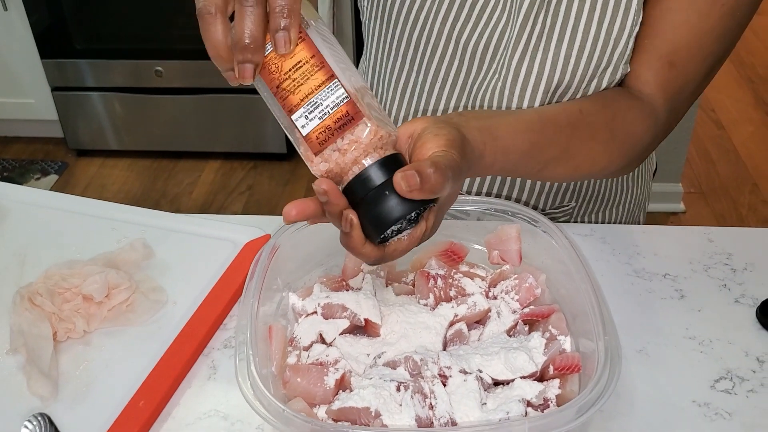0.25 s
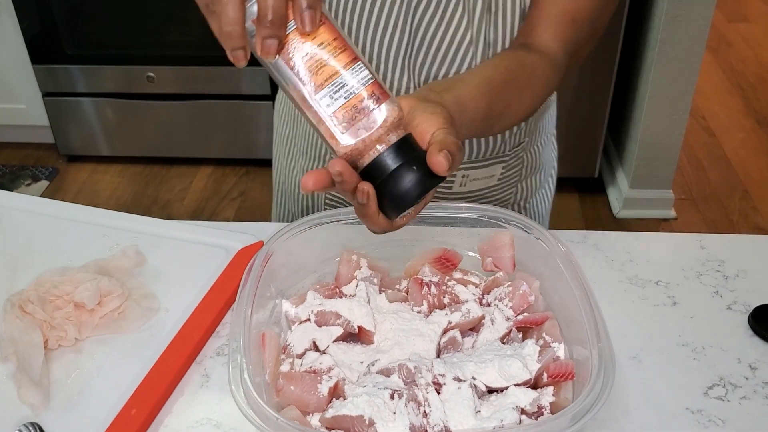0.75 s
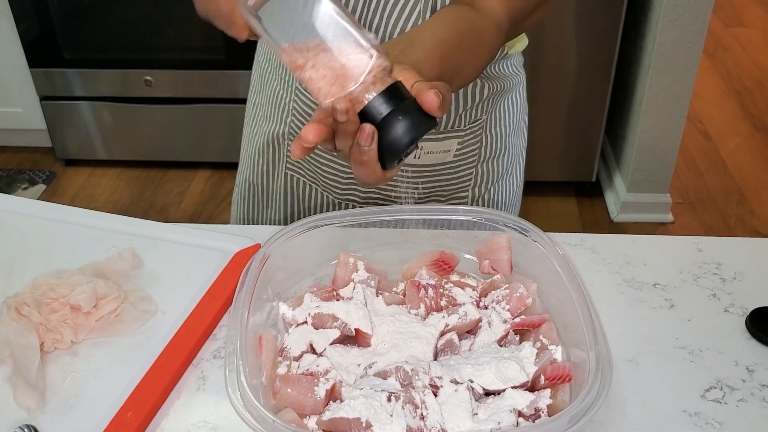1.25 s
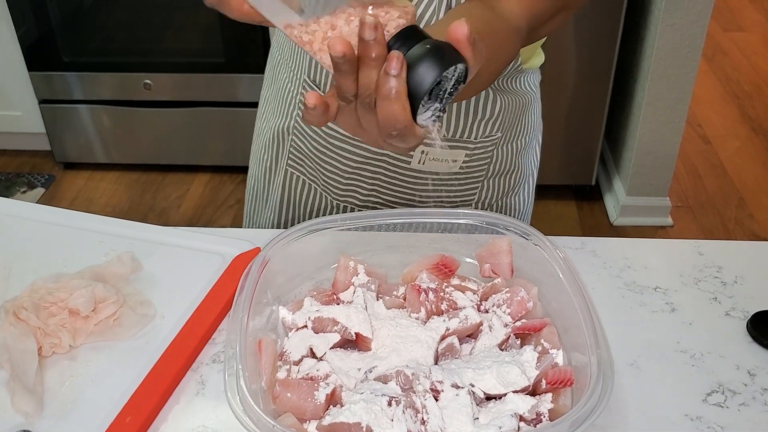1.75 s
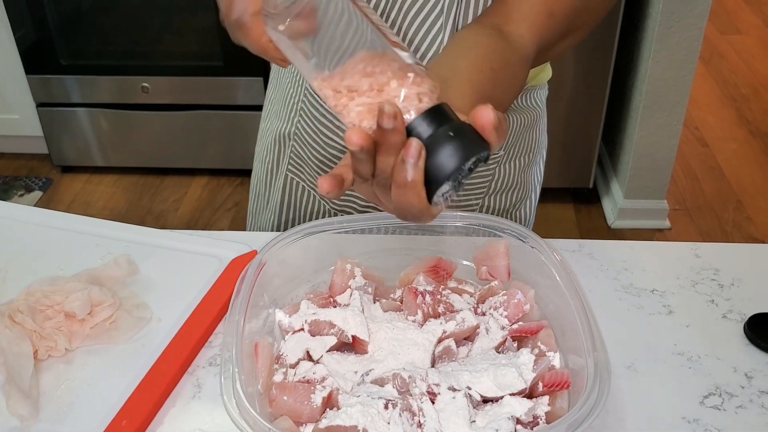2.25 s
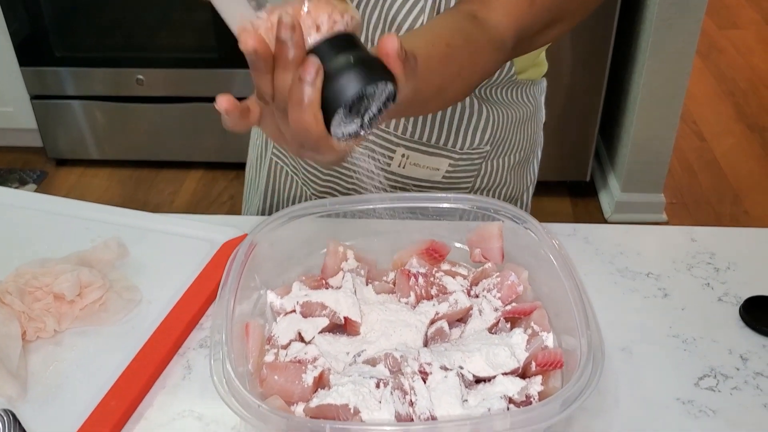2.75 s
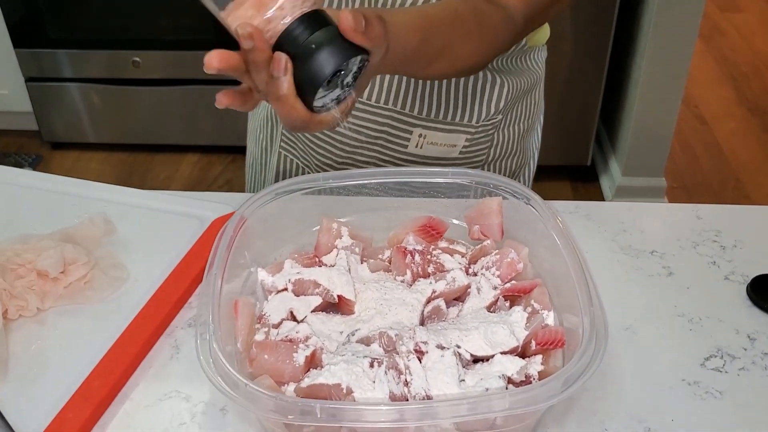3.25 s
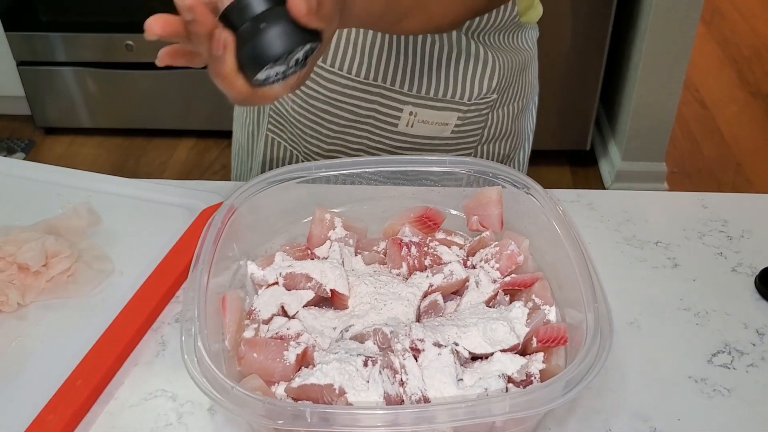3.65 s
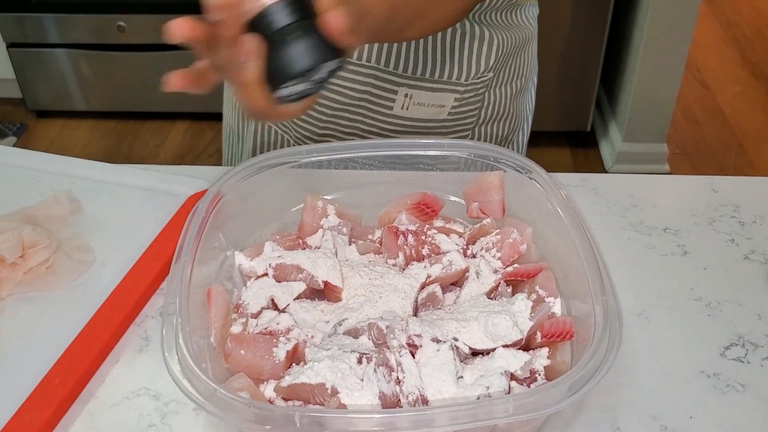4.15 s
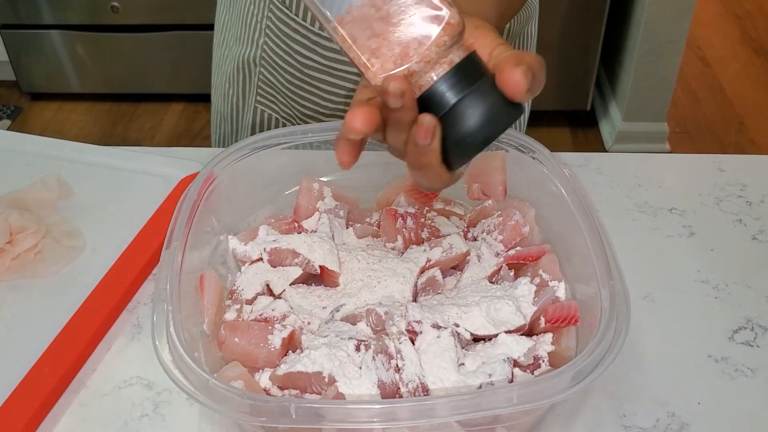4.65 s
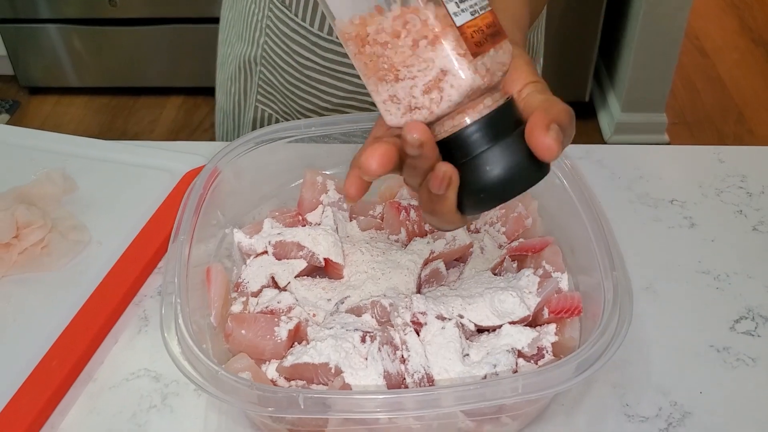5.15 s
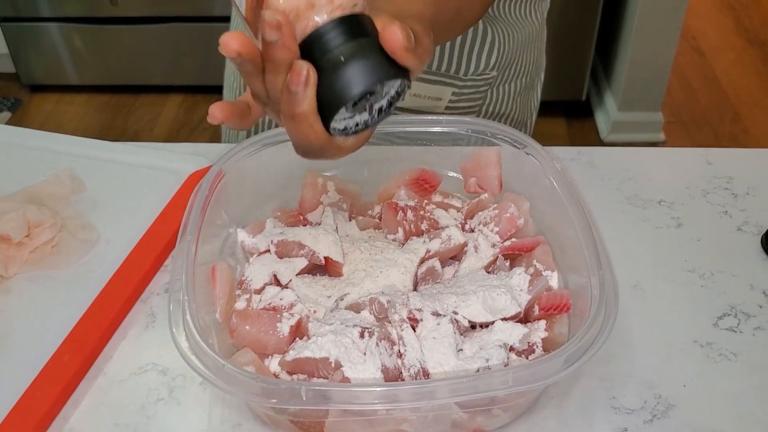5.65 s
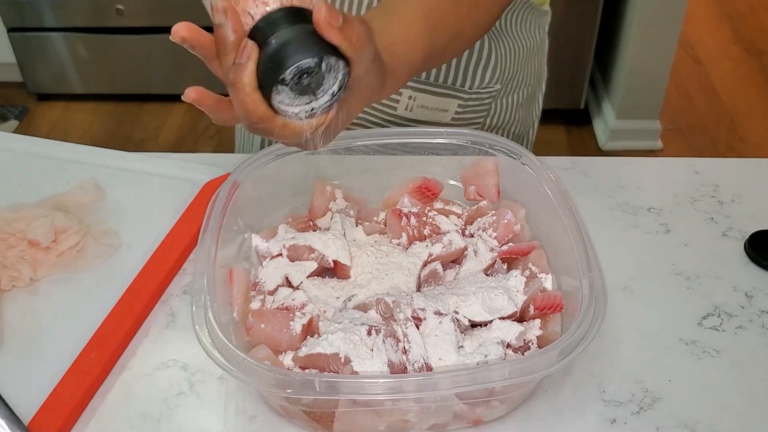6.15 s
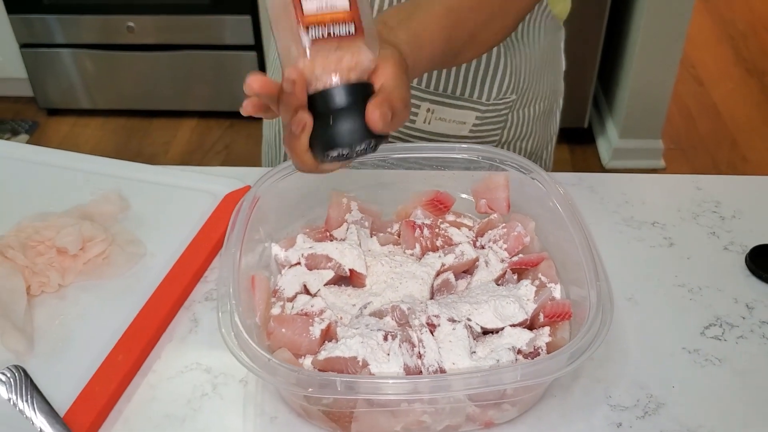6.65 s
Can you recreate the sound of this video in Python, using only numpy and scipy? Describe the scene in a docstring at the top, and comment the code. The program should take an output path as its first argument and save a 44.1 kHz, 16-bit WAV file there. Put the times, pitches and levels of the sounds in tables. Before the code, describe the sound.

Close to the microphone in a small kitchen, a plastic grinder of coarse salt is turned by hand. Two faint crunches sound within the first 0.2 seconds, then soft rubbing and low bumps of the grip until about 0.9. At 1.0 a loud, cracking stroke starts the grinding. Quick gritty twists follow, strong around 1.65, 1.9, 2.1 and 2.6, each mixing hollow crunch, fine fizz and a dull thud. It eases near 3.0, with short scrapes and crunches at 3.2 to 3.6 and a hard stroke at 3.9. After a lull with light handling, a sharp crack lands near 4.7. More strokes come at 5.0, 5.35, 5.7 and 5.95 to 6.2, with faint trickling grains between some. After a brief pause, two crisp strokes at 6.57 and 6.65 finish brightest. A short room tail follows; a very faint hush lies beneath.

```python
"""A plastic grinder of coarse salt is worked by hand over a bowl in a small kitchen, the microphone close by.
It opens on two faint strokes; then the hands rub and bump the grip, and from about one second the strokes
come quick and loud, broken by short lulls, the last two the brightest. Noise-like trains of random impacts
ring through the jar as crunch, fizz and thud; single crystals crack, scrape the wall or trickle.
A short room tail follows every sound but the steady faint hush beneath."""
import sys
import numpy as np
from scipy import signal
from scipy.io import wavfile

SR = 44100
rng = np.random.default_rng(int(sys.argv[2]) if len(sys.argv) > 2 else 0)


def int16_out(signal):
    """Quantize to a 16-bit WAV file."""
    q = np.round(np.clip(np.atleast_2d(signal).T, -1, 1) * 32767)
    wavfile.write(sys.argv[1], SR, q.astype(np.int16))


N = 303849
TIME = np.arange(N) / SR

# Large crystals that crack or strike the wall. Each row: start in seconds, level in dB ahead of the common gain,
# treble tilt in dB per octave ahead of the common brightening, decay time constant in seconds, ping in Hz.
CRACKS = [(0.021, -31.5, -2, 0.014, 1920), (0.107, -34.5, -0.5, 0.014, 799),
          (0.539, -41, -12, 0.0024, 1070), (0.978, -18.5, 2, 0.009, 910), (0.992, -11.5, -4, 0.0023, 2170),
          (1.005, -15.5, -6, 0.005, 1380), (1.049, -19, -12, 0.0057, 1170), (1.647, -18.5, -2, 0.024, 1400),
          (2.041, -23.5, 4, 0.0087, 1420), (2.081, -8, 1.3, 0.0096, 1230), (2.135, -16, -2.5, 0.015, 1190),
          (2.243, -26, 6, 0.0051, 1200), (2.596, -16, 1, 0.012, 1180), (2.622, -18.5, 2, 0.024, 1310),
          (2.648, -12.5, 1.5, 0.016, 1250), (3.006, -26, 5, 0.005, 1160), (3.093, -34, 9, 0.0091, 4660),
          (3.183, -28, -5.5, 0.0066, 1500), (3.239, -28, 10.5, 0.018, 1560), (3.544, -45, 4, 0.0067, 791),
          (3.792, -33.5, 4, 0.007, 1390), (3.819, -24.5, -2, 0.02, 1190), (3.871, -13.5, 0, 0.019, 1560),
          (3.961, -16.5, 4.5, 0.0055, 810), (4.217, -41, 2, 0.0075, 1530),
          (4.558, -21.5, -2.5, 0.0049, 1080), (4.593, -14.5, -3, 0.0028, 1390),
          (4.625, -17.5, 1, 0.0072, 1370), (4.676, -7, 3, 0.0076, 1350), (5.056, -29, 11, 0.014, 3380),
          (5.285, -38.5, 5, 0.0045, 1270), (5.324, -26.5, 1.5, 0.033, 1330),
          (5.359, -17.5, -0.5, 0.017, 1280), (5.6, -26, 6.5, 0.0069, 1980), (5.896, -30, 10, 0.0039, 1150),
          (5.926, -29, 4, 0.008, 1250), (5.972, -21.5, 3, 0.0086, 1230), (5.999, -11.5, 0, 0.0062, 1140),
          (6.034, -15.5, 3, 0.01, 1280), (6.336, -34.5, 7, 0.012, 1400), (6.573, -23, -19, 0.016, 1600),
          (6.662, -16, 7, 0.01, 3330)]
# Resonances of the jar and its cap. Each row: centre in Hz, width in Hz, lift in dB (negative is a dip).
JAR = [(481, 120, 5.5), (677.4, 20, 10.5), (810, 79, 7), (1190, 45, 6.5), (1339, 46, 6), (1564, 21, 4.5),
       (2010, 170, -1), (2020, 12, 3), (2173, 130, 4), (2403, 48, 4.5), (3117, 180, 4.5), (3460, 180, 5),
       (4690, 270, 2.5), (5380, 27, -9.5), (6360, 44, 5), (9100, 47, 4)]
# Spectrum of the crunch. Each row: frequency in Hz, relative density in dB per Hz.
COARSE = [(100, -33), (220, -3.5), (400, -7), (600, -3.5), (950, -1.5), (1250, -2), (1700, -1),
          (2300, -5.5), (2800, -6.5), (3600, -11.5), (5000, -15.5), (8000, -29.5), (15000, -63.5)]


def amp(db):
    """Decibels to gain."""
    return 10 ** (np.asarray(db) / 20)


def evened(x):
    """Scales to rms 1."""
    return x / np.sqrt(np.mean(x ** 2) + 1e-20)


def read(points, hz):
    """Reads a curve of (Hz, value) points on a log-frequency axis."""
    f, value = np.transpose(points)
    return np.interp(np.log(hz + 1), np.log(f + 1), value)


def add(mix, s, sound):
    """Mixes a sound in at s seconds."""
    part = mix[max(round(s * SR), 0):][:len(sound)]
    part += sound[:len(part)]


def steadied(x, span):
    """Holds the rms at 1 over stretches of span seconds, keeping the finer grain."""
    window = signal.windows.hann(int(span * SR) + 3)
    power = abs(signal.fftconvolve(x ** 2, window / window.sum(), "same"))
    return x / np.sqrt(power + 1e-12)


def ring(spectrum, modes=(), tilt_db=0, size=4096):
    """Causal impulse response of unit energy: a broad spectrum with resonances on top."""
    hz = abs(np.fft.fftfreq(size, 1 / SR))
    db = read(spectrum, hz) + tilt_db * np.log2(1 + hz / 1000)
    for f, width, lift in modes:
        db = db + lift / (1 + (2 * (hz - f) / width) ** 2)
    minimum_phase = np.exp(np.conj(signal.hilbert(np.log(amp(db)))))
    response = np.fft.ifft(minimum_phase).real
    return response / np.linalg.norm(response)


def through(x, response):
    """Plays x through an impulse response."""
    return signal.oaconvolve(x, response)[:len(x)]


def resonate(x, hz, width):
    """A resonance of gain 1 that follows the curve hz: shift down to zero, smooth, shift back."""
    turn = np.exp(2j * np.pi * np.cumsum(hz) / SR)
    r = np.exp(-np.pi * width / SR)
    return 2 * (turn * signal.lfilter([1 - r], [1, -r], x / turn)).real


def grains(per_s, spread_db):
    """Random impacts of either sign: many small, a few large."""
    size = amp(spread_db * np.minimum(rng.exponential(1, N), 4))
    sign = rng.choice([-1, 1], N)
    return evened(size * sign * (rng.random(N) < per_s / SR))


def swells(rows, fall_db_per_s, rise_power=1.62, sag_db_per_s=7):
    """Gain over time of movements (start, rise, hold, dB): each speeds up, holds almost level and settles."""
    power = np.zeros(N)
    t = np.arange(SR) / SR
    for start, rise, hold, db in rows:
        attack = np.minimum(t / max(rise, 1 / SR), 1) ** rise_power
        sag_db = sag_db_per_s * np.clip(t - rise, 0, hold)
        fall_db = fall_db_per_s * np.maximum(t - rise - hold, 0)
        add(power, start, (attack * amp(db - sag_db - fall_db)) ** 2)  # overlaps add in power
    return np.sqrt(power)


def room_hush(level_db=-63.5):
    """The faint steady hush of the room: white noise shaped by a broad spectrum."""
    # Each row: frequency in Hz, relative density in dB per Hz.
    hush_spectrum = [(30, -22.5), (120, 8), (200, -6), (380, -9), (600, -6.5), (950, 4.5), (1250, -11.5),
                     (1700, -15.5), (2500, -29.5), (9000, -33), (15500, -53)]
    return amp(level_db) * through(rng.standard_normal(N), ring(hush_spectrum))


def kitchen(x, gap_s=.003, count=12, tails_per_s=20):
    """A short diffuse tail, crossfaded through several random tails so that no single one colours the sound."""
    # Each row: frequency in Hz, reverberation time t60 in seconds.
    decay = [(100, 0.17), (500, 0.27), (1200, 0.16), (3000, 0.23), (6000, 0.23), (14000, 0.22)]
    out, turn = np.zeros(N), TIME * tails_per_s
    for k in range(count):
        hz, t, z = signal.stft(rng.standard_normal(SR // 2), SR, nperseg=256)
        fade = np.exp(-np.log(1000) * t / read(decay, hz)[:, None])
        tail = signal.istft(z * fade, SR)[1]
        tail[:int(gap_s * SR)] = 0  # nothing returns before the first reflection
        weight = np.sin(np.pi / 2 * np.minimum((turn - k) % count, 2))  # neighbouring tails crossfade
        out += through(x * weight, tail / np.linalg.norm(tail))
    return out


def hands(rub_db=3.5, bump_rise_s=0.0011):
    """Soft rubbing as the grip shifts, made of dense grains, and low bumps as decaying sines."""
    # Each row: start in seconds, rise in seconds, hold in seconds, level in dB ahead of rub_db.
    grip = [(.335, 0.029, 0.022, -50.5), (.385, .018, 0.012, -43), (.44, 0.015, 0.019, -40.5),
            (.525, 0.011, 0.0051, -53.5), (.66, 0.093, 0.05, -49), (.755, 0.0088, 0.0063, -41),
            (.788, 0.015, 0.0086, -44), (.88, 0.036, 0.048, -55.5), (2.46, 0.01, .02, -47.5),
            (4.26, .006, .015, -41), (4.655, .02, 0.018, -39.5), (6.35, 0.011, 0.022, -55),
            (6.51, 0.031, .02, -56.5)]
    # Each row: start in seconds, level in dB ahead of rise and decay, pitch in Hz, t60 in seconds.
    bumps = [(0.281, -47.5, 94, 0.46), (0.37, -32, 110, 0.16), (0.398, -23.5, 73.6, 0.072),
             (.453, -19, 73, 0.07), (0.536, -38.5, 101, .08), (0.767, -27.5, 109, 0.051),
             (0.794, -30, 87, .08), (1.059, -17.5, 117, 0.022), (2.388, -19.5, 132, 0.031),
             (2.636, -20.5, 105.4, 0.07), (3.338, -15, 174, 0.018), (3.432, -24.5, 100, 0.033),
             (3.954, -18.5, 60, 0.041), (4.245, -36, 90, .06), (4.264, -25, 196, 0.027),
             (5.44, -27.5, 120, 0.047)]
    # Each row: frequency in Hz, relative density in dB per Hz.
    rub_spectrum = [(30, -4), (110, 12.5), (200, 7.5), (400, 4.5), (700, -1.5), (1100, -5.5), (1600, -17),
                    (2200, -35.5), (5000, -44.5), (15000, -50.5)]
    rub = steadied(through(grains(per_s=2000, spread_db=1.5), ring(rub_spectrum)), span=0.029)
    out = amp(rub_db) * swells(grip, fall_db_per_s=448) * rub
    t = np.arange(SR // 4) / SR
    for s, db, hz, t60 in bumps:
        swell = (1 - np.exp(-t / bump_rise_s)) * np.exp(-np.log(1000) * t / t60)
        add(out, s, amp(db) * swell * np.sin(2 * np.pi * hz * t))
    return out


def trickle(per_s=600, spread_db=2.5):
    """A few loose grains slide down the tilted jar between strokes: sparse impacts through its resonances."""
    # Each row: start in seconds, rise in seconds, hold in seconds, level in dB.
    slides = [(.87, .07, .03, -71), (4.1, .04, .05, -71), (4.96, .012, .05, -61), (5.19, 0.11, 0.055, -62),
              (5.5, .03, .04, -62)]
    # Each row: frequency in Hz, relative density in dB per Hz.
    loose_spectrum = [(500, -16), (1200, 0), (2600, -6), (3800, 5), (5200, 8), (7000, -30), (11000, -43),
                      (15000, -32)]
    ticks = through(grains(per_s, spread_db), ring(loose_spectrum, JAR))
    return swells(slides, fall_db_per_s=147.5) * ticks


def scrapes(per_s=2500, spread_db=1.5, width_hz=320):
    """A crystal drags along the wall: its quick slips ring a narrow resonance and make the wall sing."""
    # Each row: start in seconds, rise in seconds, hold in seconds, level in dB, pitch in Hz.
    drags = [(3.179, 0.0026, .018, -37, 1470), (3.203, 0.0074, .022, -35.5, 1200),
             (4.585, .008, 0.0091, -36, 1370), (5.283, .003, 0.0073, -53, 1270),
             (5.322, 0.028, 0.04, -34.5, 1350), (5.892, .005, 0.022, -49, 1220),
             (5.92, .005, 0.037, -40, 1230), (5.97, 0.0047, 0.036, -28.5, 1320)]
    out, slips = np.zeros(N), grains(per_s, spread_db)
    t = np.arange(SR // 4) / SR
    for k, (start, rise, hold, db, hz) in enumerate(drags):
        pitch = np.full(len(t), hz)
        own_slips = slips[k * len(t):][:len(t)]
        tone = resonate(resonate(own_slips, pitch, width_hz), pitch, width_hz)
        shape = swells([(0, rise, hold, db)], fall_db_per_s=597)[:len(t)]
        add(out, start, shape * steadied(tone, span=0.039))
    return out


def cracks(gain_db=-6, bright_db=2, ping_db=9, ping_width=500, rise_s=0.00056):
    """A crystal bursts: a sudden volley of chips on the jar, with a ping of its own, quickly dying away."""
    out, t = np.zeros(N), np.arange(4096) / SR
    chips = grains(per_s=6500, spread_db=3.5)
    for k, (s, db, tilt_db, length, hz) in enumerate(CRACKS):
        colour = ring(COARSE, JAR + [(hz, ping_width, ping_db)], tilt_db + bright_db)
        own_chips = chips[k * len(t):][:len(t)]
        volley = steadied(through(own_chips, colour), span=0.0083)
        burst = (1 - np.exp(-t / rise_s)) * np.exp(-t / max(length, 1 / SR))
        add(out, s, amp(db + gain_db) * volley * burst)
    return out


def stalls(jam_db=-1, jam_s=0.019):
    """Gain over time: the salt stalls for a moment, dipping in level, before a large crystal gives way."""
    dip, t = np.zeros(N), np.arange(0, 3 * jam_s, 1 / SR)
    for s, *_ in CRACKS:
        add(dip, s - t[-1], np.exp(-((t - t[-1]) / jam_s) ** 2))
    return amp(jam_db * dip)


def chinks(impacts, spectrum, low_hz, high_hz, lift_db, count=8):
    """Each crystal has a pitch of its own by its size, heard through the jar."""
    size_class = rng.integers(0, count, N)
    out = np.zeros(N)
    for k, hz in enumerate(np.geomspace(low_hz, high_hz, count)):
        out += through(impacts * (size_class == k), ring(spectrum, JAR + [(hz, hz / 3, lift_db)]))
    return out


def salt(coarse_db=-1, fine_db=2.0, clump_db=2.0, clump_s=0.0038, small_share=2.06,
         usual_db=-34, crowding=.55, hardening=0.33, glint_hz=7500,
         hollow_db=1.5, bite_db=-7, bite_hz=2200, deep_hz=70, deep_db=-2):
    """Crystals tumble in clumps; every large impact also sheds fizz, and the whole load pushes on the jar."""
    # Each push of the hands sets the salt moving. Each row: start in seconds, rise in seconds, hold in seconds,
    # coarse crunch in dB, fine fizz in dB (both ahead of their common gains), thud of the load in dB,
    # pitch of the jar's hollow in Hz.
    strokes = [(0.0, 0.001, .053, -45, -50.5, -55, 880), (0.097, .006, .008, -47, -60, -48.5, 790),
               (0.968, .012, .086, -29.5, -37.5, -40.5, 1120),
               (1.037, 0.082, 0.044, -34, -36.5, -40.5, 1360), (1.257, .12, .11, -43, -46.5, -51.5, 1100),
               (1.539, 0.071, 0.017, -34, -40.5, -42.5, 1000),
               (1.622, 0.036, 0.073, -26.5, -33.5, -39, 1210), (1.822, .068, 0.045, -24, -27, -42, 1300),
               (1.956, 0.032, .13, -38.5, -39, -49, 1240), (2.051, 0.026, 0.085, -26, -33.5, -37.5, 1230),
               (2.155, 0.081, 0.036, -36.5, -38.5, -56, 1000), (2.29, 0.077, 0.035, -31, -31.5, -41, 1380),
               (2.457, 0.087, 0.043, -34.5, -37, -44.5, 1300), (2.513, 0.13, 0.068, -29, -32.5, -38, 1290),
               (2.832, 0.088, 0.11, -39, -41.5, -49, 1278), (3.09, 0.023, 0.25, -50.5, -53, -56, 1450),
               (3.175, 0.023, 0.096, -36, -44, -46, 1480), (3.281, 0.036, 0.044, -28.5, -32.5, -41.5, 1460),
               (3.512, 0.068, 0.028, -35.5, -37.5, -45, 1190),
               (3.77, 0.071, 0.025, -33, -40.5, -47.5, 1220),
               (3.867, 0.0097, 0.056, -24, -31.5, -39.5, 1300), (4.186, 0.037, 0.042, -44.5, -49, -48, 910),
               (4.254, 0.022, 0.052, -38.5, -39, -51, 1150), (4.402, 0.016, 0.042, -57, -65.5, -86, 960),
               (4.527, 0.081, .094, -32, -39, -38.5, 1290), (4.806, 0.035, 0.06, -56, -59.5, -62, 950),
               (5.007, 0.054, 0.0024, -33.5, -35, -49.5, 1380),
               (5.287, 0.089, 0.032, -27.5, -33.5, -38.5, 1300), (5.533, 0.078, 0.024, -46, -50, -47, 1624),
               (5.644, 0.076, 0.055, -30, -33.5, -44.5, 1270),
               (5.868, 0.064, 0.0075, -38.5, -36.5, -50, 1240),
               (5.923, 0.071, 0.047, -24, -32.5, -39.5, 1310), (6.043, 0.04, 0.1, -31, -36, -49, 1370),
               (6.144, 0.031, 0.012, -42, -33.5, -44, 1680),
               (6.186, .014, 0.075, -39.5, -40.5, -42.5, 1390),
               (6.557, 0.021, 0.064, -29.5, -28.5, -40, 1560), (6.64, .023, 0.035, -19, -20, -35.5, 1760)]
    # Spectra of the fizz and of the load. Each row: frequency in Hz, relative density in dB per Hz.
    fine_spectrum = [(600, -32.5), (1500, 3), (2500, 0.5), (3900, 0.5), (5000, 2), (6200, -2.5),
                     (7500, -6.5), (9500, -8.5), (12000, -15), (14000, -22), (15700, -33)]
    thud_spectrum = [(15, -58.5), (25, -6), (38, -9), (55, -9.5), (95, 3.5), (130, -1.5), (190, -6),
                     (300, -13), (500, -28.5), (1200, -85)]
    start, rise, hold, coarse_level, fine_level, load_level, hollow_hz = np.transpose(strokes)
    coarse = swells(zip(start, rise, hold, coarse_level), fall_db_per_s=239.5)
    fine = swells(zip(start, rise, hold, fine_level), fall_db_per_s=315)  # fine grains settle first
    load = swells(zip(start, rise, hold, load_level), fall_db_per_s=178.5)

    vigour = np.clip(fine / amp(usual_db), .1, 10)
    clump_window = signal.windows.hann(int(2 * clump_s * SR) + 3)
    clumps = amp(clump_db * evened(through(rng.standard_normal(N), clump_window)))
    crowd = .5 + vigour ** crowding  # a brisk stroke sets more crystals moving
    large = clumps * grains(per_s=1100 * crowd, spread_db=2.5)
    small = clumps * grains(per_s=5000 * crowd, spread_db=1.5)

    knocks = chinks(large, COARSE, low_hz=590, high_hz=2940, lift_db=10)
    hollow_curve = np.interp(TIME, start + rise + hold / 2, hollow_hz)
    hollow = amp(hollow_db) * resonate(knocks, hollow_curve, width=810)
    bite = amp(bite_db) * np.sqrt(vigour) * resonate(knocks, np.full(N, bite_hz), width=900)
    crunch = steadied(knocks + hollow + bite, span=0.075)  # hard strokes bite more

    fizz = chinks(large + small_share * small, fine_spectrum, low_hz=2560, high_hz=13300, lift_db=3.5)
    glint = signal.sosfiltfilt(signal.butter(2, glint_hz, "high", fs=SR, output="sos"), fizz)
    fizz = steadied(fizz + (vigour ** hardening - 1) * glint, span=0.18)  # faster impacts are brighter

    thud = through(large, ring(thud_spectrum))
    deep = signal.sosfiltfilt(signal.butter(2, deep_hz, fs=SR, output="sos"), thud)
    thud = steadied(thud + amp(deep_db) * np.minimum(vigour, 2) * deep, span=0.1)  # a hard push thuds deeper
    return amp(coarse_db) * crunch * coarse + amp(fine_db) * fizz * fine + thud * load


def scene(room_db=-9, crack_room_db=-5):
    """Salt, cracks and hands in the room, over its faint hush."""
    crunch = salt() * stalls() + scrapes() + trickle()
    blows, handling = cracks(), hands()
    hush = room_hush()
    room = kitchen(amp(room_db) * (crunch + handling) + amp(crack_room_db) * blows)
    return (crunch + blows + handling + room + hush)[None]


def record(dry, bass_hz=37, ceiling=1.0, edge_hz=15750):
    """The microphone sheds deep bass and rounds the highest peaks; then the treble is cut at edge_hz."""
    x = signal.sosfilt(signal.butter(3, bass_hz, "high", fs=SR, output="sos"), dry)
    x = ceiling * np.tanh(x / ceiling)
    band_limit = signal.firwin(801, edge_hz, window=("kaiser", 8), fs=SR)
    return signal.oaconvolve(x, band_limit[None], "same")


dry = scene()
out = record(dry)
int16_out(out)
```